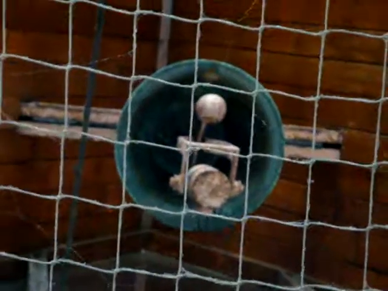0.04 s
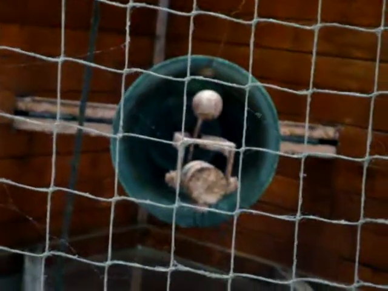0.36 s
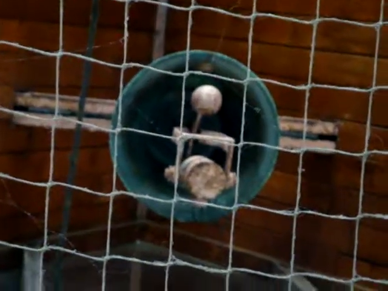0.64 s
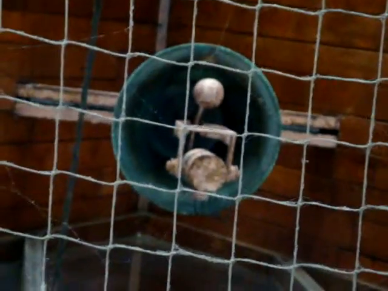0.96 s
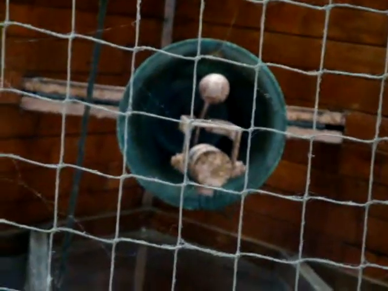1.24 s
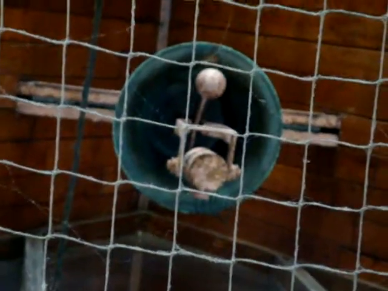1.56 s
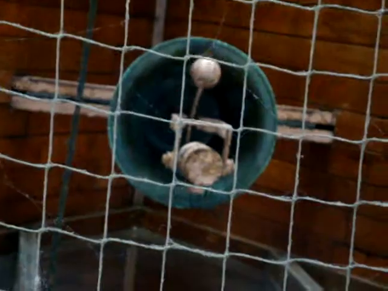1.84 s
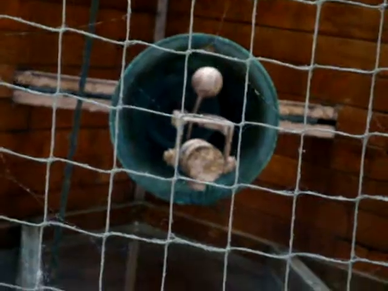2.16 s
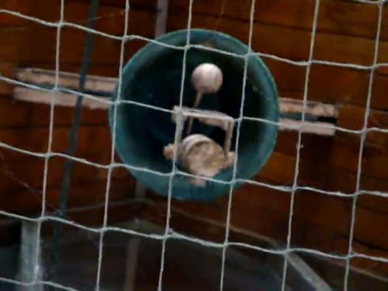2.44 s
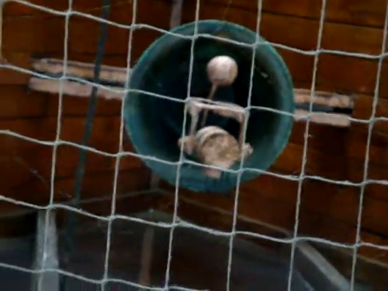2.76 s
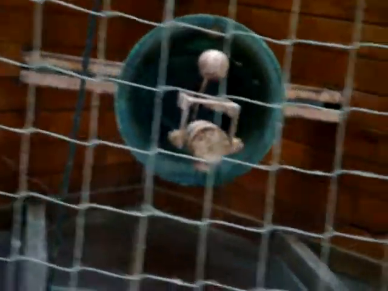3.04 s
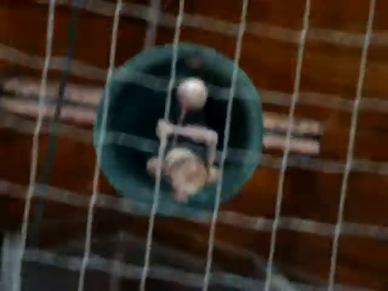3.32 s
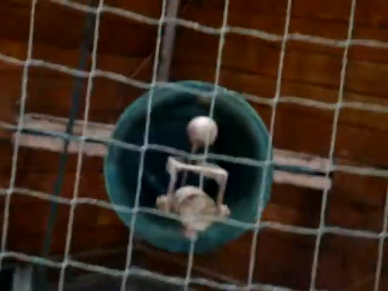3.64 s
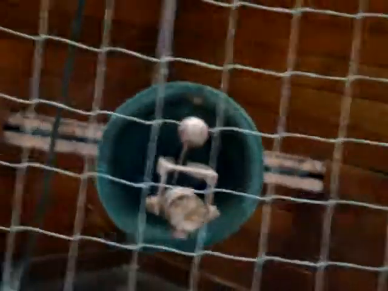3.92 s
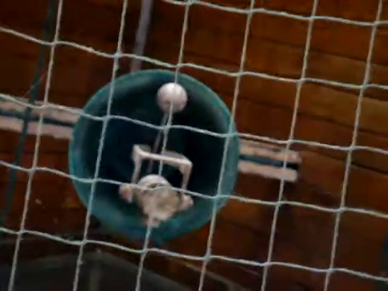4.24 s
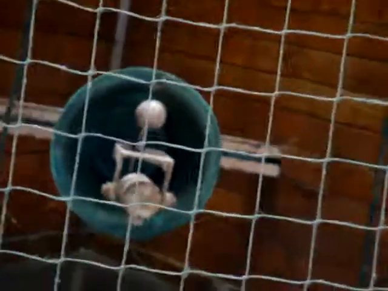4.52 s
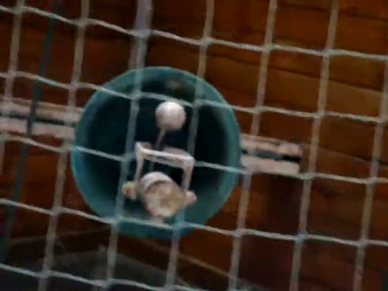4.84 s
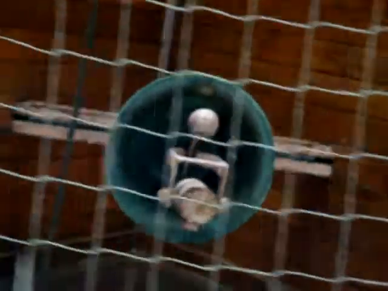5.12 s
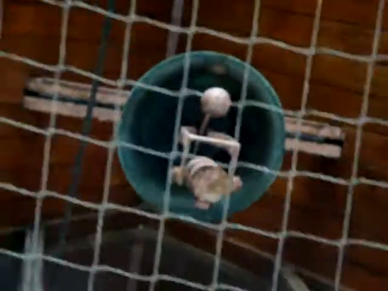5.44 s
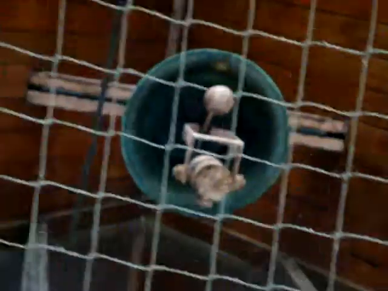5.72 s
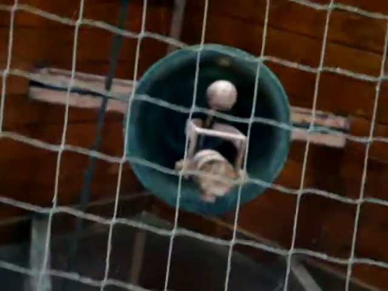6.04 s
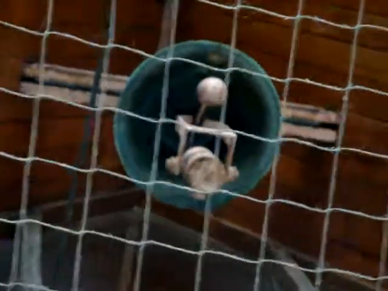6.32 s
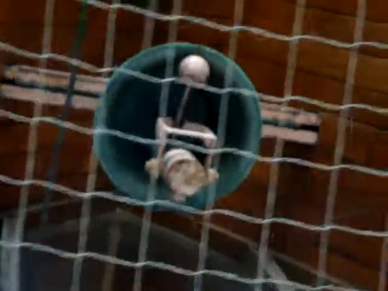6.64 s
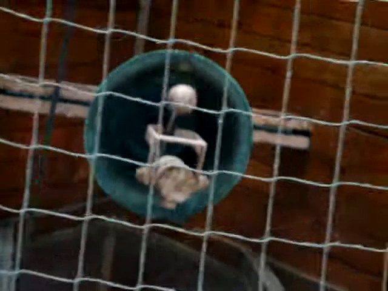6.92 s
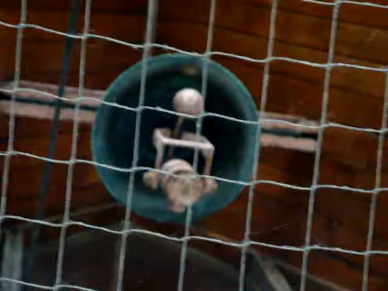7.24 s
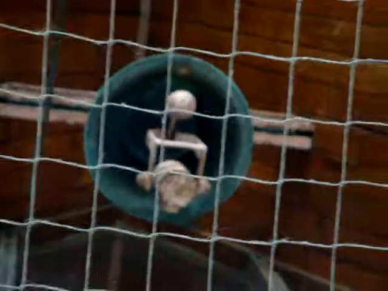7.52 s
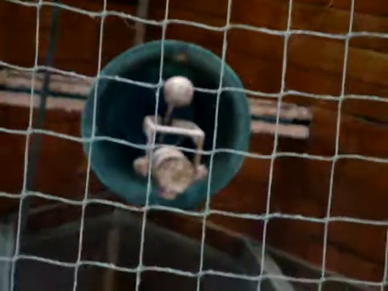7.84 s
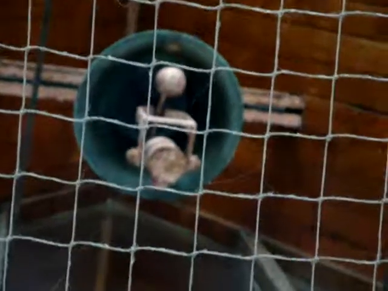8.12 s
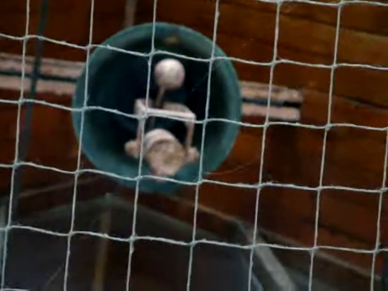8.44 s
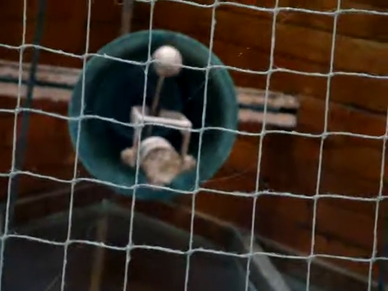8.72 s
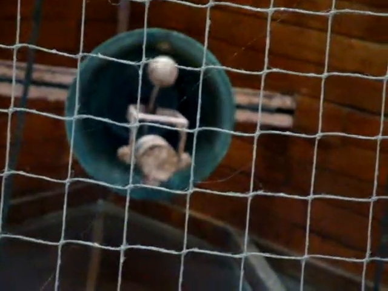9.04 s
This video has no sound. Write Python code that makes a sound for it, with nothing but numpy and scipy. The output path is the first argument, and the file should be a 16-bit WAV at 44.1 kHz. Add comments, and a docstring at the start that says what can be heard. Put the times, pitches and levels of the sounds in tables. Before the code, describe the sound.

A large bell is struck four times by a hammer close overhead, each hard clank opening into a long, wavering ring.

```python
"""Four hard clanks, each opening into a long ring: a clock hammer strikes a large bell in a timber
belfry, close above a hand-held microphone. The partials beat, and swell and fade as the microphone
drifts; the low ones linger from an earlier stroke. Faint handling knocks, linkage ticks and squeaks
fall in between. Gain control ducks at every blow and creeps back, so the bell's hum and the
outdoor wash swell up between strokes."""
import sys
import numpy as np
from scipy import signal
from scipy.fft import rfft, irfft, next_fast_len
from scipy.io import wavfile
from scipy.ndimage import uniform_filter1d, minimum_filter1d

SR = 44100
rng = np.random.default_rng(int(sys.argv[2]) if len(sys.argv) > 2 else 0)


def dump_mix(stems):
    """Bounce the given channels to the path in sys.argv[1] as a 16-bit WAV at rate SR."""
    frames = np.atleast_2d(stems).T  # one column per channel
    limited = np.clip(frames, -1, 1)  # hard clip at full scale
    pcm = np.round(limited * 32767).astype(np.int16)
    wavfile.write(sys.argv[1], SR, pcm)


N = 404397
T = np.arange(N) / SR

# Hammer blows; the first falls before we start listening. Each row: start in seconds, force in dB,
# then extra dB on each of the nine partials that change most from blow to blow.
STRIKES = [(-5, -3, 0, 4, 0, 0, 0, 0, 0, 0, 0), (1.718, 0, 1.5, 5.7, 5, 1, 0, -1, 3, -1, -1),
           (4.218, 0, 2, 2.5, 4.5, -2, 1, -1.5, 1, 3, -3), (6.654, 0, -2.5, -4, -5, 4, 4, 2, -1, -1, 3),
           (8.824, 0, -2, -6, -5, -3, -8, 2, -4, -1, 1)]


def bell(rise_s=.012, delay_s=.007, waver_db=1.8, main_waver_db=.8, room_share=.4, room_s=.12, gain_db=-2):
    """Each blow restarts the partials; all beat with a twin, the main ones also against their echo."""
    # The bell's partials, each a close pair. Each row: pitch in Hz, relative level in dB,
    # t60 in seconds, beat in Hz, relative size of the twin.
    modes = [(347.6, -27.5, 45, .355, .47), (691.9, -9, 10.4, 1.29, .42), (830.1, 2, 6.3, 1.285, .44),
             (1102.7, .7, 3.5, .632, .34), (1388.6, 7.9, 2.6, .968, .28), (1852.9, 10, 1.9, 3.3, .25),
             (1929.4, 3.5, 2.5, .806, .38), (2054.6, 11, 3.45, 1.872, .16), (2422.2, 2.9, 2.15, 1.174, .32),
             (2687.9, -9, 2.1, 7.03, .15), (2723.4, -15, 3.2, 3.07, .15), (2799.3, 11.2, 2.35, 1.509, .22),
             (2877.7, -10, 2.3, 4.96, .15), (3102.5, -2, 2.3, 3.68, .25), (3209.4, -1, 2.3, 1.71, .25),
             (3511.3, -1.5, 2.3, 1.82, .3), (3601.8, 7.8, 2.3, 2.092, .47), (3802.0, -6, 2.7, 5.95, .15),
             (4137.1, -7.5, 1.4, 6.79, .15), (4177.3, -9.5, 2.1, 2.46, .15), (4247.4, -2.5, 1.4, 3.08, .15),
             (4440.6, 6, 1.75, 3.4, .4), (4946.3, -14.5, 2.1, 3.85, .15), (5300.4, 6.3, 1.65, 3.62, .3),
             (5913.9, -15, 2.1, 1.12, .15), (6178.2, .5, 1.52, 3.75, .3), (6945.8, -21, 2, 3.46, .3),
             (7062.2, -4.5, 1.48, 5.88, .2), (7945.0, -9, 1.35, 2.2, .2), (8388.4, -14, 1.5, 2.7, .45),
             (8823, -18, 1.2, 3, .3), (9701, -21, 1.2, 4, .3)]
    # Rows of modes that take the extra dB in STRIKES, in column order.
    touched = [0, 2, 4, 5, 6, 7, 8, 11, 16]
    # Rows of modes that carry the tone: hum, prime, tierce, quint, nominal and strong ones above.
    main = [0, 1, 2, 3, 4, 5, 6, 7, 8, 11, 16, 21]
    # The drifting microphone shifts each main partial's echo in pitch, so the two cancel now and then.
    # Each row: time of a beat trough in seconds, echo shift in Hz, relative size of the echo,
    # time of a cancellation in seconds, build-up in seconds.
    sways = [(1.347, -.085, .7, 1.753, .02), (.72, -.396, .6, 1.828, .05), (.452, -.272, .57, 2.31, .18),
             (.083, -.443, .34, .046, .015), (.327, .425, .65, 1.7, .02), (.1, .052, .6, 6.762, .01),
             (.665, .221, .5, 1.895, .02), (.174, .42, .52, 1.41, .01), (.355, .346, .68, 1.198, .015),
             (.575, -.99, .41, 1.004, .015), (.022, -.81, .28, 1.056, .02), (.097, -.429, .41, 1.985, .03)]
    starts, force_db, *touch_db = np.transpose(STRIKES)
    slow = np.arange(0, T[-1] + .01, .002)  # coarse clock for the envelopes
    blow, slow_blow = (np.maximum(np.searchsorted(starts, t) - 1, 0) for t in (T, slow))
    age, slow_age = T - starts[blow], slow - starts[slow_blow]
    out = np.zeros(N)
    for k, (hz, db, t60, beat_hz, twin) in enumerate(modes):
        level_db = gain_db + db + force_db[slow_blow] - 60 * slow_age / t60
        if k in touched:
            level_db += touch_db[touched.index(k)][slow_blow]
        if k in main:
            trough_s, shift_hz, echo_size, cancel_s, build_s = sways[main.index(k)]
            beat = twin * turn(beat_hz * (slow - trough_s))
            echo = echo_size * turn(shift_hz * (slow - cancel_s))
            build = 1 - np.exp(-slow_age / build_s)
            sway = abs(1 - beat - echo) * build * amp(main_waver_db * wander(slow, rate=9))
        else:
            beat = twin * turn(beat_hz * slow_age + rng.random(len(starts))[slow_blow])
            sway = abs(1 - beat) * amp(waver_db * wander(slow, rate=9))
        envelope = np.interp(T, slow, amp(level_db) * sway)
        out += envelope * np.sin(2 * np.pi * (hz * age + rng.random(len(starts))[blow]))
    # the ring jumps up as the first reflections arrive, then grows as the belfry fills
    onset = 1 - np.exp(-(np.maximum(age - delay_s, 0) / rise_s) ** 2)
    fill = 1 - room_share * np.exp(-age / room_s)
    return out * onset * fill


def hammer(crack_db=-10.5, crack_s=.0007, clank_db=-14.5, clank_s=.03,
           early_db=-3, early_s=.07, clang_db=-6.7, delay_s=.011):
    """Close overhead: the crack of contact, the hammer's brief clank, and their echoes under the roof."""
    # Iron on bronze. Each row: frequency in Hz, relative noise density in dB.
    clank_spectrum = [(40, -47), (150, -31), (750, -14), (1900, -13), (3200, 0), (3900, -11), (4800, -8),
                      (6100, -19), (8500, -20), (10000, -29), (13000, -50)]
    # The belfry's answer to the blow. Each row: frequency in Hz, relative noise density in dB.
    belfry_spectrum = [(40, -40), (150, -28), (400, -15), (1000, -7.5), (1600, -2), (2300, -4), (2800, 3),
                       (3400, -4.5), (4600, -8.5), (5300, -4), (5800, -13), (6300, -9), (7000, -15),
                       (8500, -17), (10000, -29), (13000, -50)]
    # How long the belfry rings. Each row: frequency in Hz, t60 in seconds.
    belfry_t60 = [(100, .4), (600, .7), (2500, 1.6), (5000, 1.75), (10000, 1.05)]
    crack_spectrum = [(100, -28), (1000, -6), (3200, 0), (5500, -7), (10000, -22), (13000, -40)]
    t, out = np.arange(3 * SR // 2) / SR, np.zeros(N)
    early_shape = (1 - np.exp(-t / .003)) * np.exp(-t / early_s)
    for start, force_db, *_ in STRIKES[1:]:
        crack = amp(crack_db) * np.exp(-t / crack_s) * noise(crack_spectrum, len(t))
        clank = amp(clank_db) * np.exp(-t / clank_s) * noise(clank_spectrum, len(t))
        early = amp(early_db) * early_shape * noise(belfry_spectrum, len(t))
        hz, age, bands = signal.stft(noise(belfry_spectrum, len(t)), SR, nperseg=512)
        decay = amp(clang_db - 60 * age / read(belfry_t60, hz)[:, None])
        tail = signal.istft(bands * decay, SR, nperseg=512)[1][:len(t)]
        add(out, start, amp(force_db) * (crack + clank))
        add(out, start + delay_s, amp(force_db) * (early + tail))
    return out


def shimmer(db=-17, low_hz=3300, high_hz=9900, tilt_db=-7.5, spread_db=3.5,
            t60_low=1.6, t60_high=1.25, count=36):
    """A crowd of weak, short upper partials brightens the first second of each stroke."""
    t, out = np.arange(2 * SR) / SR, np.zeros(N)
    height = ((np.arange(count) + rng.random(count)) / count)[:, None]
    hz = low_hz * (high_hz / low_hz) ** height
    t60 = t60_low + (t60_high - t60_low) * height
    rings = amp(db + tilt_db * height - 60 * t / t60) * np.sin(2 * np.pi * hz * t)
    for start, force_db, *_ in STRIKES[1:]:
        sizes = amp(force_db + spread_db * rng.standard_normal(count)) * rng.choice([-1, 1], count)
        add(out, start, sizes @ rings * (1 - np.exp(-t / .012)))
    return out


def haze(ring, db=-19, low_hz=750):
    """A faint rough haze surrounds the partials above the hum and fades with them."""
    highpass = signal.butter(2, low_hz, "high", fs=SR, output="sos")
    flutter = noise([(0, 0), (60, -1), (200, -4), (500, -11), (1500, -22), (5000, -45)], N)
    return amp(db) * signal.sosfilt(highpass, signal.sosfilt(highpass, ring) * flutter)


def handling(knock_s=.018):
    """The hand that holds the microphone gives it soft, low knocks."""
    # Each row: start in seconds, level in dB.
    knocks = [(.03, -49), (2.61, -45), (2.745, -41), (2.8, -37), (2.89, -46), (3.185, -36), (8.275, -43),
              (8.54, -47)]
    spectrum = [(30, -24), (100, -3), (220, 0), (400, -12), (1500, -45)]
    t, out = np.arange(SR // 2) / SR, np.zeros(N)
    push = t / knock_s * np.exp(1 - t / knock_s)
    for start, db in knocks:
        add(out, start, amp(db) * push * noise(spectrum, len(t)))
    return out


def linkage(tick_s=.003, echo_db=-14, echo_s=.06):
    """The hammer's linkage ticks, with a short echo."""
    # Each row: start in seconds, level in dB.
    ticks = [(.181, -35), (.187, -38), (4.11, -44), (6.45, -34), (6.457, -37)]
    spectrum = [(800, -20), (2300, -2), (3400, 0), (5000, -9), (10000, -24)]
    t, out = np.arange(SR // 2) / SR, np.zeros(N)
    snap = np.exp(-t / tick_s) + amp(echo_db) * np.exp(-t / echo_s)
    for start, db in ticks:
        add(out, start, amp(db) * snap * noise(spectrum, len(t)))
    return out


def squeaks(roughness=.5, jitter_hz=30, echo_s=.035):
    """Thin high tones, unsteady in pitch and level, trail off in a short echo."""
    # Each row: start in seconds, length in seconds, pitch in Hz, level in dB.
    tones = [(2.55, .15, 9500, -41), (3.41, .05, 9620, -44), (3.66, .11, 9560, -37), (4.0, .14, 9510, -41),
             (4.18, .025, 9540, -39), (6.45, .07, 8680, -51)]
    t, out = np.arange(SR // 2) / SR, np.zeros(N)
    for start, length, hz, db in tones:
        shape = (1 - np.exp(-t / .005)) * np.exp(-np.maximum(t - length, 0) / echo_s)
        cycles = np.cumsum(hz + jitter_hz * wander(t, rate=150)) / SR
        flicker = 1 + roughness * wander(t, rate=90)
        add(out, start, amp(db) * shape * flicker * np.sin(2 * np.pi * cycles))
    return out


def outdoors(db=-41.5, swell_db=.6):
    """The steady wash from outside the belfry."""
    # Each row: frequency in Hz, relative noise density in dB.
    wash = [(20, -30), (50, -16), (90, -19), (170, -6), (300, -3), (550, 0), (950, .3), (1600, -6),
            (2600, -13), (4000, -20.5), (5700, -30), (10000, -42)]
    return amp(db + swell_db * wander(T, rate=4)) * noise(wash, N)


def amp(db):
    """Decibels to gain."""
    return 10 ** (np.asarray(db) / 20)


def turn(cycles):
    """A unit pointer turned by so many cycles."""
    return np.exp(2j * np.pi * cycles)


def read(points, hz):
    """Reads a table on a log-frequency axis."""
    table_hz, value = np.transpose(points)
    return np.interp(np.log(hz + 1), np.log(table_hz + 1), value)


def add(mix, start, sound):
    """Mixes a sound in at a start time in seconds."""
    part = mix[max(round(start * SR), 0):][:len(sound)]
    part += sound[:len(part)]


def noise(spectrum, size):
    """Noise of rms 1, shaped by (Hz, dB) points."""
    n = next_fast_len(size)
    gains = amp(read(spectrum, np.fft.rfftfreq(n, 1 / SR)))
    shaped = irfft(rfft(rng.standard_normal(n)) * gains, n)[:size]
    return shaped / np.sqrt(np.mean(shaped ** 2) + 1e-20)


def wander(t, rate):
    """A random curve of about unit size, with rate new values a second."""
    knots = np.arange(t[0], t[-1] + 2 / rate, 1 / rate)
    return np.interp(t, knots, rng.standard_normal(len(knots)))


def scene():
    """Bell, hammer and surroundings at one microphone just below the bell."""
    ring = bell()
    strokes = ring + haze(ring) + shimmer() + hammer()
    return (strokes + handling() + linkage() + squeaks() + outdoors())[None]


def record(dry, limit_db=-16.2, hold_s=.18, recover_s=1.25, ceiling=.75,
           hiss_db=-61.3, makeup_db=3.5, edge_hz=10050):
    """Gain control falls at once, holds and recovers slowly; then soft overload, hiss and a band limit."""
    power_db = 10 * np.log10(abs(uniform_filter1d(dry[0] ** 2, size=200)) + 1e-12)
    over_db = np.maximum(power_db - limit_db, 0)
    hold = 2 * int(hold_s * SR / 2) + 1
    held_db = -minimum_filter1d(-over_db, hold, origin=hold // 2)
    relax = np.exp(-T / recover_s)
    duck_db = uniform_filter1d(np.maximum.accumulate(held_db / relax) * relax, size=60)
    ducked = dry[0] * amp(makeup_db - duck_db)
    rounded = ducked / (1 + (ducked / ceiling) ** 8) ** (1 / 8)
    hiss = amp(hiss_db) * noise([(20, -9), (300, -7), (2000, 0), (5000, 1), (10000, -1), (13000, -20)], N)
    lowpass = signal.firwin(511, edge_hz, window=("kaiser", 9), fs=SR)
    return signal.oaconvolve(rounded + hiss, lowpass, "same")[None]


dry = scene()
out = record(dry)
dump_mix(out)
```